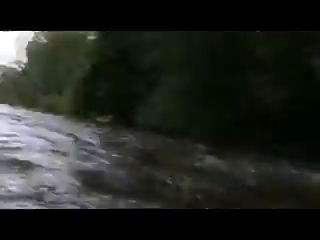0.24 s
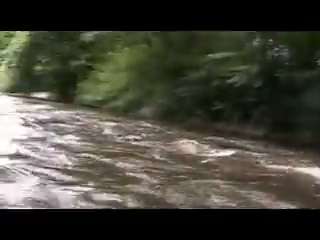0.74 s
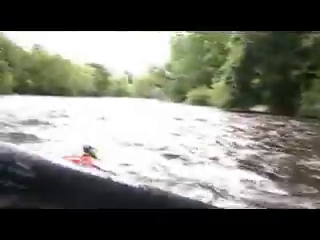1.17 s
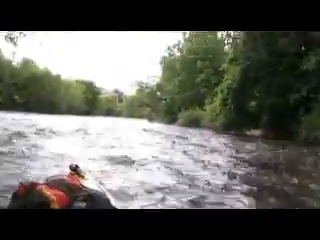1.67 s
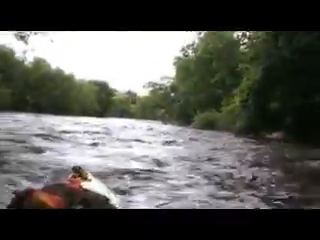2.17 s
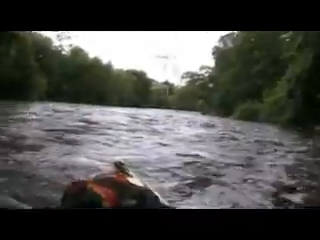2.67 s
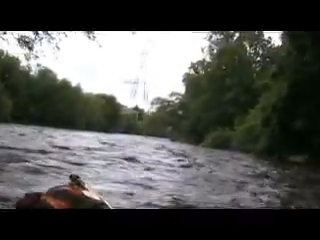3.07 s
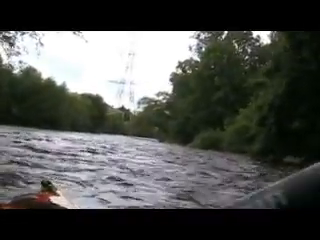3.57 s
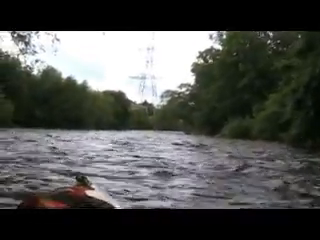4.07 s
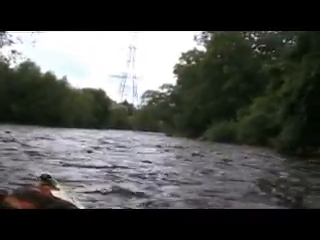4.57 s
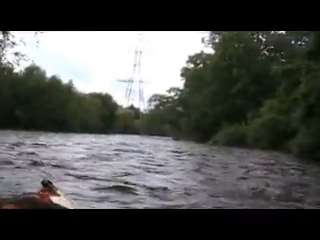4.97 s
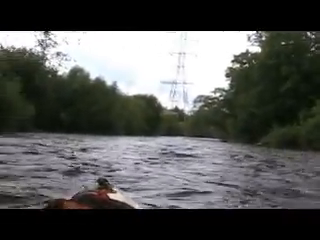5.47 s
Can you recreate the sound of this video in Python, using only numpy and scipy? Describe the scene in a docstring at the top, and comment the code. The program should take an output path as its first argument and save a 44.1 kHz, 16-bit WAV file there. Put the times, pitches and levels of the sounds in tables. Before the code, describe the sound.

A kayak rides a fast, rough river, heard from on board in mono, close to the water and outdoors. A smooth, steady roar of rapids lies behind everything, while nearer water churns, gurgles and fizzes unevenly along the hull, with a faint low hum. From 0.2 to 0.5 s the water surges with spray and quick plops; at about 0.5 s a paddle strikes the plastic hull, a loud, hollow, slightly clipped knock. More slaps and bubbly plops follow near 0.9, 1.35 and 1.65 s, then it calms around 2 to 2.7 s. A sharp cluster of slaps and plops comes at 2.85 s, and the level drops out very briefly at 3.25 s. Spray swishes strongly at 3.55 s; gentler gurgling follows. Snappy plops and slaps around 4.55 to 4.85 s lead into a broad swish at 4.9 s, before the water settles with small ticking drops until the end at about 5.7 s.

```python
"""A fast river around a kayak, heard on board: rapids roar behind, water churns and gurgles along the hull.
Smooth rapids, churn and spray are shaped noise; gliding bubble tones make the gurgle and fizz.
Low hull modes hum, drops tick, sheets of spray swish, water slaps and closing air pockets plop.
The paddle knocks the hull once, ringing its modes; much later the level dips briefly."""
import sys
import numpy as np
from scipy import signal
from scipy.fft import rfft, irfft, next_fast_len
from scipy.io import wavfile
from scipy.ndimage import uniform_filter1d, map_coordinates

SR = 44100
rng = np.random.default_rng(int(sys.argv[2]) if len(sys.argv) > 2 else 0)


def dump_mix(stems):
    """Bounce the given channels to the path in sys.argv[1] as a 16-bit WAV at rate SR."""
    frames = np.atleast_2d(stems).T  # one column per channel
    limited = np.clip(frames, -1, 1)  # hard clip at full scale
    pcm = np.round(limited * 32767).astype(np.int16)
    wavfile.write(sys.argv[1], SR, pcm)


N = 252693


def amp(db):
    """Logarithmic level: decibels to amplitude gain."""
    return 10 ** (np.asarray(db) / 20)


def unit(x):
    """Power normalisation: x scaled to rms 1."""
    return x / np.sqrt(np.mean(x ** 2) + 1e-20)


def wobble(rate):
    """Slow random modulation: a smooth curve through random knots, rate of them a second."""
    knots = rng.standard_normal(int(N * rate / SR) + 4)
    return map_coordinates(knots, [np.arange(N) * rate / SR])


def curves(rows):
    """Linear interpolation: one value per sample for each column after the time."""
    s, *columns = np.transpose(rows)
    return [np.interp(np.arange(N) / SR, s, column) for column in columns]


def place(s, waves):
    """Superposition: rows of samples added into one track at their times."""
    at = (np.asarray(s)[:, None] * SR).astype(int) + np.arange(waves.shape[1])
    return np.bincount(at.ravel(), waves.ravel(), N + waves.shape[1])[:N]


def coloured(x, spectrum):
    """Spectral shaping: x filtered by (frequency [Hz], gain [dB]) points on a log axis, rms 1."""
    m = next_fast_len(N + 8192)
    hz, db = np.transpose(spectrum)
    log_hz = np.log(np.fft.rfftfreq(m, 1 / SR) + 1)
    gain = amp(np.interp(log_hz, np.log(hz + 1), db))
    return unit(irfft(rfft(x, m) * gain, m)[:N])


def tilted(x, pivot_hz, bright_db):
    """Spectral tilt: the part above the pivot lifted against the part below."""
    low = signal.sosfiltfilt(signal.butter(1, pivot_hz, fs=SR, output="sos"), x)
    return amp(-bright_db / 2) * low + amp(bright_db / 2) * (x - low)


def rush(patchy_db):
    """Turbulence noise: white noise with patches of random gain, about 350 Hz by 50 ms."""
    z = signal.stft(rng.standard_normal(N + 1024), nperseg=512)[2]
    field = uniform_filter1d(rng.standard_normal(z.shape), size=4, axis=0)  # across frequency
    field = uniform_filter1d(field, size=8, axis=1)  # along time
    patchy = z * amp(patchy_db * unit(field))
    return unit(signal.istft(patchy, nperseg=512)[1][:N])


def rings(s, gain, hz, rise, t60, glide, size):
    """Damped resonance: sines that swell, then die, gliding in pitch while loud; one a row."""
    t = np.arange(size) / SR
    gain, hz, rise, t60, glide = (np.asarray(v)[..., None] for v in (gain, hz, rise, t60, glide))
    pitch = hz * 2 ** (glide * np.minimum(t, rise + t60 / 4))  # glide in octaves/s
    turns = np.cumsum(pitch, axis=1) / SR
    shape = np.minimum(t / rise, 1) * amp(-60 * np.maximum(t - rise, 0) / t60)
    return place(s, gain * shape * np.sin(2 * np.pi * turns))


def bubbles(count, lo_hz, hi_hz, cycles, spread_db, size):
    """Bubble resonance: random tones in loose clumps, equally strong per Hz; most glide up."""
    when, pitch, big, life, bend = rng.random((count, 5)).T
    hz = lo_hz * (hi_hz / lo_hz) ** pitch
    t60 = cycles * 2 ** (2 * life - 1) / hz
    clump_db = 1.8 * wobble(12)[(when * N).astype(int)]
    size_db = -spread_db * np.log(big + .02)
    gain = amp(clump_db + size_db) * np.sqrt(hz / t60)  # equal power per Hz
    glide = (2 * bend - .6) / t60
    return unit(rings(when * N / SR, gain, hz, 2 / hz, t60, glide, size))


# spectrum of the far rapids: (frequency [Hz], relative level per Hz [dB])
RAPIDS_SPECTRUM = [(30, -34), (70, -3.5), (200, -5), (436, -6.5), (760, -1.5), (1560, -9.5), (2860, -19),
                   (4340, -29.5), (8000, -35), (10300, -52), (13000, -62)]


def rapids():
    """Broadband turbulence: far rapids blend into a smooth noise of nearly steady level."""
    level_db = -39.5 + 0.29 * wobble(2.5)
    return amp(level_db) * coloured(rush(patchy_db=-1.5), RAPIDS_SPECTRUM)


# spectrum of the water along the hull: (frequency [Hz], relative level per Hz [dB])
CHURN_SPECTRUM = [(110, -45), (180, -1), (374, -2), (623, -4.5), (723, -4), (904, -5.5), (1770, -10.5),
                  (3500, -26), (4550, -58), (7700, -120)]
# water working along the hull: (time [s], level before surge and tilt [dB], treble over bass [dB])
CHURNING = [(0, -28, -7), (.18, -31, 10.5), (.3, -23, 0), (.5, -20, 4.5), (.57, -28, -1), (.92, -27.5, 7.5),
            (1.04, -30, 0.5), (1.34, -31, -1), (1.45, -37.5, -12), (1.66, -30, 11.5), (1.95, -32, -6.5),
            (2.19, -33, -3.5), (2.3, -29.5, 3), (2.5, -33, -1), (2.7, -39, -8.5), (2.85, -27, -1.5),
            (2.92, -29, 4), (3.16, -30.5, 3), (3.36, -30, 1.5), (3.52, -38, -15.5), (3.87, -28, 5.5),
            (4.19, -33.5, 5), (4.48, -32, 1), (4.56, -29.5, 5), (4.83, -31, -0.5), (5.08, -29.5, 8),
            (5.38, -38, -6.5), (5.73, -37, -3)]


def churn(surge_db):
    """Turbulence with bubble resonance: nearby water is noise carrying gurgling bubbles."""
    gurgle = bubbles(count=2500, lo_hz=300, hi_hz=2800, cycles=34, spread_db=1.8, size=2000)
    water = coloured(rush(patchy_db=0.5) + 0.46 * gurgle, CHURN_SPECTRUM)
    level_db, bright_db = curves(CHURNING)
    return amp(level_db + surge_db) * tilted(water, 850, bright_db)


# spectrum of the spray: (frequency [Hz], relative level per Hz [dB])
SPRAY_SPECTRUM = [(900, -34), (1500, 1.5), (2100, -0.5), (3400, -2), (4400, -3.5), (7000, -5.5),
                  (8500, -7.5), (9600, -12.5), (10300, -26.5), (12000, -41.5)]
# steady spray off the current: (time [s], level before surge, flutter and tilt [dB], treble over bass [dB])
SPRAYING = [(0, -35.5, -2), (.5, -37, -6), (1, -36.5, 0.5), (1.42, -43, -1), (1.75, -41, -9),
            (2.18, -45, -4), (2.3, -42, 0), (2.55, -47, 6), (2.75, -46, -1), (2.9, -39.5, 8),
            (3.36, -38, -6.5), (3.5, -42.5, -2), (3.8, -39.5, -11), (4.13, -42.5, -3), (4.47, -40, 9),
            (4.8, -38, -12), (5.25, -44.5, -2), (5.73, -48.5, -3.5)]


def spray(surge_db):
    """Superposed droplet tones: a hiss of noise, long-ringing fizz and short spatter."""
    fizz = bubbles(count=5000, lo_hz=2200, hi_hz=10000, cycles=28, spread_db=2.6, size=600)
    spatter = bubbles(count=350, lo_hz=2500, hi_hz=9500, cycles=9, spread_db=2.2, size=300)
    hiss = coloured(rush(patchy_db=3.0) + 0.5 * fizz + 0.33 * spatter, SPRAY_SPECTRUM)
    level_db, bright_db = curves(SPRAYING)
    flutter_db = .6 * wobble(60)
    return amp(level_db + surge_db + flutter_db) * tilted(hiss, 5000, bright_db)


def water():
    """Common modulation: breaking wavelets lift churn and spray together over the rapids."""
    surge_db = .4 * wobble(22)
    return rapids() + churn(surge_db) + spray(surge_db)


# hull modes shaken by the current: (frequency [Hz], offset of the -10 dB skirts [Hz])
HUM_MODES = [(68, 32), (138, 76)]
# hum of the hull: (time [s], low mode level before sway [dB], upper mode level before sway [dB])
HUMMING = [(0, -45, -39.5), (.38, -35.5, -40.5), (.63, -37.5, -34), (.85, -51, -38), (1.17, -38.5, -37.5),
           (1.5, -45, -47.5), (1.6, -44.5, -40), (1.93, -43, -49), (2.1, -38, -44), (2.5, -45, -41),
           (3, -44, -48.5), (3.32, -47.5, -43.5), (4.2, -48, -46), (4.7, -48.5, -51), (5.15, -45, -47.5),
           (5.73, -42, -43)]
SWAY_DB, SWAY_PER_S = 1, 7  # the hum wavers


def boom():
    """Forced vibration: the current keeps two low hull modes humming unevenly."""
    total = 0
    for (hz, width), level_db in zip(HUM_MODES, curves(HUMMING)):
        resonance = [(hz / 2, -36), (hz - width, -10), (hz, 0), (hz + width, -10), (hz * 3, -40)]
        mode = coloured(rng.standard_normal(N), resonance)
        total = total + amp(level_db + SWAY_DB * wobble(SWAY_PER_S)) * mode
    return total


# drops striking close by: (time [s], level of the ring [dB], frequency of the ring [Hz])
TICKS = [(0.1075, -10.5, 6900), (.378, -17, 7100), (.4499, -12, 3600), (.57, -20.5, 5500),
         (0.8917, -16.5, 2720), (1.235, -18, 2610), (1.292, -20, 7750), (1.3372, -16.5, 3100),
         (1.3704, -18, 7540), (1.541, -26, 4020), (1.578, -13.5, 6880), (1.583, -17, 8000),
         (1.624, -20, 6500), (1.8432, -18.5, 2960), (2.0515, -16.5, 7400), (2.181, -24.5, 4360),
         (2.27, -24.5, 4560), (2.603, -16, 7550), (2.681, -19, 6670), (2.796, -23, 6290),
         (2.82, -10.5, 7300), (2.8838, -22, 2810), (2.927, -20, 4900), (2.975, -19.5, 6500),
         (2.9919, -13.5, 4160), (3.0675, -17, 4580), (3.155, -21, 5600), (3.2162, -13.5, 4300),
         (3.374, -20, 3500), (3.43, -21, 3840), (3.569, -11, 3300), (3.869, -12.5, 2570),
         (3.9085, -18, 3500), (3.972, -23, 7850), (4.1866, -21, 6600), (4.419, -23, 7000),
         (4.522, -18, 8100), (4.495, -24, 6800), (4.5463, -21, 6317), (4.6404, -24, 6000),
         (4.68, -27, 8500), (4.712, -22, 7500), (4.745, -21, 4200), (4.985, -18, 7000), (5.0783, -20, 5070),
         (5.598, -22, 7000), (5.608, -23, 4820), (5.651, -16, 8050)]
CRACK_T60_S = 0.013


def ticks():
    """Impact and cavity resonance: a drop gives a broad crack and a brief ring of its tiny cavity."""
    s, db, hz = np.transpose(TICKS)
    t = np.arange(1200) / SR
    noise = np.diff(rng.standard_normal((len(s), len(t) + 1)))  # differencing favours treble
    crack = noise * amp(db[:, None] - 10.0 - 60 * t / CRACK_T60_S)
    ring = rings(s, amp(db), hz, 1.2 / hz, 0.4 * CRACK_T60_S, 0, size=1200)
    return ring + place(s, crack)


# sheets of spray thrown up; rise and fall are the times for 10 dB:
# (time at full strength [s], level before tilt [dB], rise [s], hold [s], fall [s])
SWISHES = [(0.23, -32, 0.091, 0.16, .1), (0.424, -29, .1, 0.043, 0.033), (.64, -34, 0.095, .05, 0.094),
           (1.25, -40, 0.081, 0.022, 0.12), (1.562, -35.5, .03, .02, 0.069),
           (1.68, -37.5, .08, 0.054, 0.085), (1.906, -41, 0.037, 0.0088, 0.023),
           (1.995, -44.5, 0.048, .05, 0.091), (2.645, -41, 0.1, 0.033, 0.044),
           (2.82, -37, 0.043, .02, 0.031), (3.07, -41, 0.042, .03, .08), (3.561, -28.5, .03, 0.079, 0.081),
           (3.854, -36.5, 0.043, 0.04, 0.16), (4.252, -40, 0.091, 0.036, 0.074),
           (4.547, -35.5, 0.065, .03, 0.07), (4.678, -36.5, 0.032, .03, 0.069),
           (4.91, -29, 0.059, 0.099, 0.11), (5.613, -47.5, 0.039, 0.033, 0.095)]


def swishes():
    """Incoherent power addition: each sheet swells, holds and dies away in one smooth, dense hiss."""
    s, db, rise, hold, fall = np.transpose(SWISHES)[..., None]
    t = np.arange(N) / SR - s
    before_or_after = np.maximum(-t / rise, (t - hold) / fall)
    below_db = 10 * np.maximum(before_or_after, 0)
    strength = np.linalg.norm(amp(db - below_db), axis=0)  # powers add
    hiss = coloured(rush(patchy_db=2.6), SPRAY_SPECTRUM)
    return strength * tilted(hiss, 4800, bright_db=2.5)


# water slapping the hull: (time [s], level before a 2.5 dB cut [dB], decay time T60 [s], upper band edge [Hz])
SLAPS = [(.2165, -15.5, 0.068, 1490), (0.8404, -18, .02, 2480), (0.895, -16, 0.018, 2500),
         (.924, -29, 0.055, 1500), (1.3378, -10.5, 0.02, 5600), (1.371, -19, .008, 3000),
         (1.643, -19, 0.026, 2500), (2.833, -22, 0.022, 3000), (2.84, -13.5, 0.042, 2870),
         (3.227, -31, 0.018, 4000), (4.569, -20, 0.032, 5000), (4.839, -16, 0.021, 4000)]


def slaps():
    """Band-limited impact noise: a decaying burst, duller for a broader sheet of water."""
    t = np.arange(2400) / SR
    bursts = []
    for s, db, t60, top_hz in SLAPS:
        band = signal.butter(2, [300, top_hz], "band", fs=SR, output="sos")
        noise = unit(signal.sosfilt(band, rng.standard_normal(len(t))))
        bursts.append(amp(db - 2.5 - 60 * t / t60) * noise)
    return place([row[0] for row in SLAPS], np.array(bursts))


# air pockets closing: (time [s], level [dB], pitch [Hz], decay time T60 [s], glide [octaves/s])
PLOPS = [(.218, -17.5, 586, 0.076, -17), (0.223, -16, 1660, .012, 8), (0.289, -14, 460, 0.036, -21),
         (.304, -14.5, 900, .05, 4), (.3096, -13, 1590, 0.017, -8), (.313, -15.5, 398, 0.042, 32),
         (.33, -18, 543, 0.12, -6.5), (0.3837, -13, 414, .028, 13), (.436, -8.5, 810, 0.0061, -126),
         (0.4524, -14.5, 1710, .012, 37), (0.486, -7.5, 1780, 0.019, -18), (0.563, -17.5, 150, .082, -15),
         (.622, -24, 1716, 0.027, -4), (.6432, -13, 1600, 0.011, 73), (.765, -11.5, 1670, 0.016, -92),
         (0.8394, -15.5, 466, 0.028, -12), (0.8933, -11.5, 475, 0.026, -51), (.8941, -17, 2330, 0.01, -70),
         (.8938, -8.5, 1400, 0.018, -26), (.9236, -10, 653, 0.023, 59), (1.339, -21, 1690, .04, -53),
         (1.3482, -23, 830, .012, -13), (1.37, -13.5, 1303, 0.0043, -141), (1.642, -10.5, 380, 0.013, -60),
         (1.645, -10, 1170, 0.03, -11), (1.6553, -17, 507, 0.11, 6), (1.69, -22, 1590, 0.046, 8),
         (1.729, -15, 1570, 0.0065, -20), (1.742, -17, 468, 0.14, -2), (2.0934, -21.5, 1360, 0.033, -26),
         (2.2335, -16, 644, 0.04, 28), (2.424, -27, 132.5, .34, 2), (2.48, -31, 143.6, 0.31, -2),
         (2.832, -15, 1860, .014, -1), (2.8415, -8.5, 1027, .027, -24), (2.8426, -9, 1860, 0.0076, -66),
         (2.8755, -14, 1590, 0.031, 20), (2.888, -15.5, 1400, .008, -162), (2.9522, -17.5, 826, 0.05, -26),
         (3.0035, -17.5, 990, 0.028, 10), (3.046, -17, 1586, .015, 19), (3.06, -28, 870, 0.16, -9),
         (3.1051, -24, 1990, 0.041, -5), (3.141, -25, 946, 0.13, -2.5), (3.1724, -17.5, 720, 0.014, 79),
         (3.2266, -18, 1870, 0.0064, 195), (3.3396, -22, 3020, 0.021, 3), (3.855, -19.5, 357, 0.069, -3),
         (3.8766, -19, 365, 0.038, 3), (3.883, -18, 1770, .008, 94), (3.994, -26, 380, 0.09, -1),
         (4.075, -23.5, 484, 0.076, 11), (4.094, -22, 970, 0.046, -10), (4.1, -24, 345, 0.027, 0),
         (4.27, -22, 340, .034, 5), (4.295, -26, 300, 0.024, 4), (4.5514, -23.5, 391, 0.11, -23.5),
         (4.565, -9, 1550, 0.0041, -20), (4.7015, -12, 1270, 0.034, -10), (4.7216, -12.5, 860, .013, -11),
         (4.751, -14.5, 1020, .025, 60), (4.8057, -10, 451, 0.045, 96.5),
         (4.8298, -10.5, 900, 0.0099, -104), (4.8411, -17.5, 668, 0.07, -23),
         (5.0274, -15.5, 1030, .008, 92), (5.0503, -23, 586, 0.044, -42), (5.0997, -20, 930, 0.012, 21)]
PLOP_RISE_CYCLES = 1.37  # a pocket swells for this many cycles of its pitch


def plops():
    """Bubble resonance: each trapped pocket of air rings at its own gliding pitch."""
    s, db, hz, t60, glide = np.transpose(PLOPS)
    return rings(s, amp(db), hz, PLOP_RISE_CYCLES / hz, t60, glide, size=9000)


# paddle on hull: (time [s], level [dB])
KNOCK = (.5064, -3)
# hull modes it excites: (frequency [Hz], level relative to the knock [dB], decay time T60 [s])
HULL_MODES = [(269, -0.5, 0.15), (329, 9.5, 0.036), (184, -8.5, 0.14), (839, -2, 0.063),
              (1150, -1.5, 0.045), (2866, 4, 0.019)]


def knock():
    """Impulsive modal excitation: the shaft strikes the plastic hull; a crack, then its modes."""
    s, db = KNOCK
    hz, mode_db, t60 = np.transpose(HULL_MODES)
    t = np.arange(N) / SR - s
    crack = (t > 0) * amp(-3 - 60 * np.abs(t) / 0.035) * rng.standard_normal(N)
    modes = rings(0 * hz + s, amp(mode_db), hz, 0.42 / hz, t60, 0, size=6000)
    return amp(db) * (crack + modes)


def scene():
    """Linear superposition: every source adds at the single microphone."""
    return (water() + boom() + ticks() + swishes() + slaps() + plops() + knock())[None]


# brief dip in level: (start time [s], end time [s], level [dB])
DIP = (3.2522, 3.285, -28)
TOP_HZ = 10280  # middle of the upper band edge


def record(dry):
    """Band limiting and saturation: bass roll-off, soft clipping, a brief dip, a treble cutoff."""
    x = signal.sosfilt(signal.butter(3, 52, "high", fs=SR, output="sos"), dry)
    x = x / (1 + np.abs(x / .68) ** 6) ** (1 / 6)  # peaks saturate towards 0.68
    start, end, db = DIP
    t = np.arange(N) / SR
    x = x * np.where((t > start) & (t < end), amp(db), 1)
    m = next_fast_len(N + 8192)
    edge = (TOP_HZ - np.fft.rfftfreq(m, 1 / SR)) / 300 + .5  # 300 Hz wide
    keep = np.clip(edge, 0, 1) ** 2
    return irfft(rfft(x, m) * keep, m)[:, :N]


dry = scene()
out = record(dry)
dump_mix(out)
```